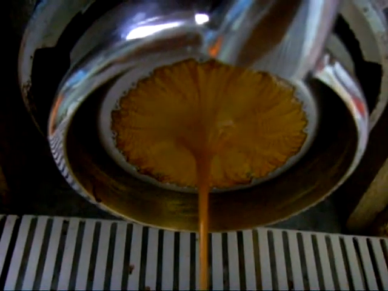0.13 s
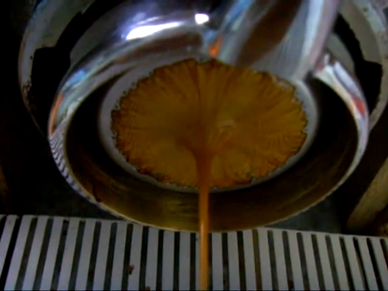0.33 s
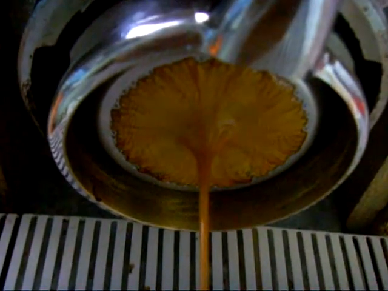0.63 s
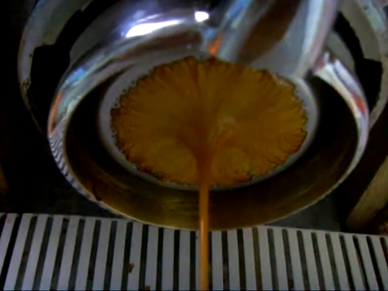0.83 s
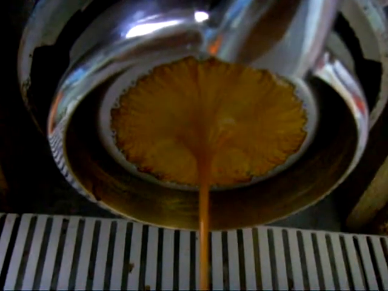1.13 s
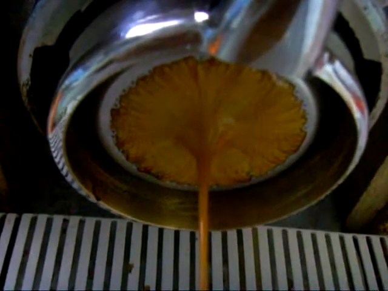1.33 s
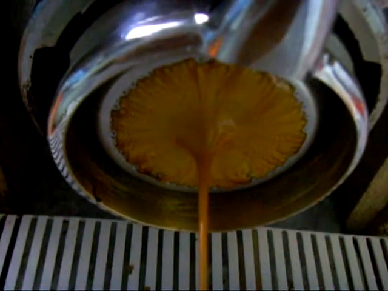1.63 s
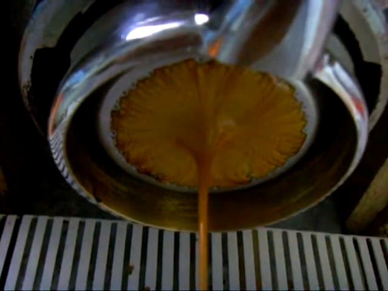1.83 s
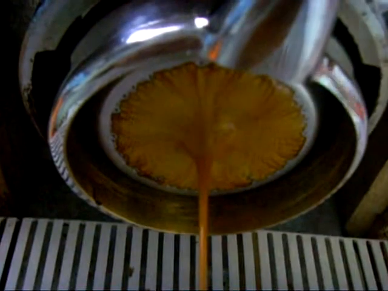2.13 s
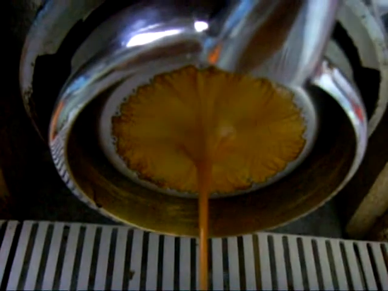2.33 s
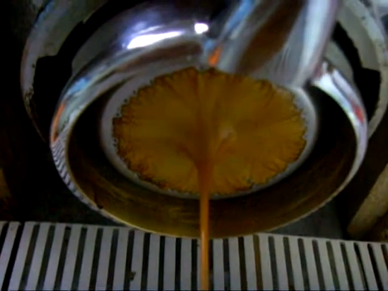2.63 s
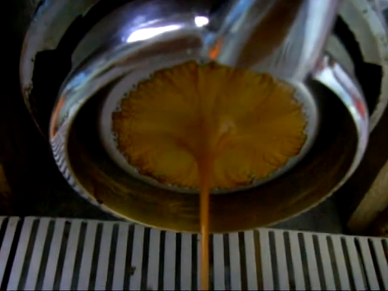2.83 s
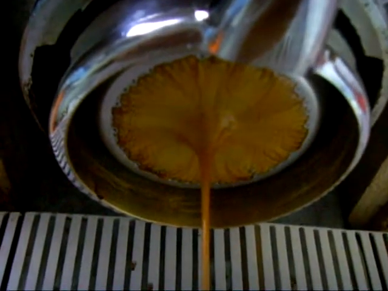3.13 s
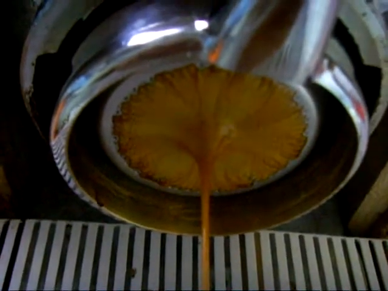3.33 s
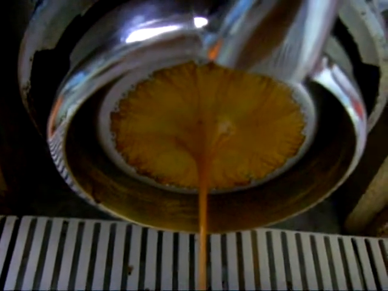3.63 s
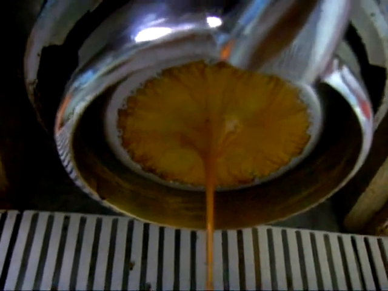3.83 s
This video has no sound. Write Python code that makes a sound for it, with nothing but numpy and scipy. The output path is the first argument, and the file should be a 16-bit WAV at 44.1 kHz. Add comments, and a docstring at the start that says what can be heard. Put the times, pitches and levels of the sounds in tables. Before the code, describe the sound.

An espresso machine pump buzzes loudly and steadily up close, its metal casing rattling. It cuts off abruptly before halfway, leaving small wet ticks and spits that thin out, and a faint puff of steam in a quiet room.

```python
"""A loud, clattering buzz stops and leaves ticking, spitting and fizzing in a quiet room.
It is an espresso machine's vibration pump, heard up close and then switched off.
Fifty times a second its piston clacks and shakes the casing, over the hum of its coil.
Afterwards the metal rings out, and the wet, hot machine gives off pops of water and puffs of steam."""
import sys
import numpy as np
from scipy import signal
from scipy.fft import rfft, irfft
from scipy.io import wavfile
from scipy.ndimage import uniform_filter1d

SR = 44100
rng = np.random.default_rng(int(sys.argv[2]) if len(sys.argv) > 2 else 0)


def write(x):
    x = np.atleast_2d(x).T
    wavfile.write(sys.argv[1], SR, np.round(np.clip(x, -1, 1) * 32767).astype(np.int16))


N = 176400
PUMP_HZ, FIRST_STROKE_S, OFF_S = 50.03, 0.003, 1.712


def amp(db):
    """Turns decibels into a number to multiply by."""
    return 10 ** (np.asarray(db) / 20)


def unit(x):
    """Scales a sound to an average (rms) level of 1."""
    return x / np.sqrt(np.mean(x ** 2) + 1e-20)


def running_level(x, db):
    """Sets the average level that a sound has while the pump runs."""
    return x * amp(db) / np.sqrt(np.mean(x[:round(OFF_S * SR)] ** 2) + 1e-20)


def look_up(points, hz):
    """Reads between the rows of a table, on a scale of octaves."""
    freqs, values = np.transpose(points)
    return np.interp(np.log(hz + 1), np.log(freqs + 1), values)


def add(mix, start_s, sound):
    """Mixes a sound in at a given time."""
    part = mix[max(round(start_s * SR), 0):][:len(sound)]
    part += sound[:len(part)]


def colour(x, tone):
    """Turns each frequency up or down as a table says."""
    gain = amp(look_up(tone, np.fft.rfftfreq(2 * N, 1 / SR)))
    return irfft(rfft(x, 2 * N) * gain)[:N]


def noise_band(hz, octaves):
    """Noise that is strongest around one frequency."""
    freqs = np.fft.rfftfreq(N, 1 / SR) + 1
    distance = np.log2(freqs / hz) / octaves
    return unit(irfft(rfft(rng.standard_normal(N)) / (1 + distance ** 2), N))


def bursts(table):
    """Short bursts of noise that start sharply and fade."""
    t, out = np.arange(N) / SR, np.zeros(N)
    for start_s, db, hz, octaves, fade_s in table:
        shape = np.minimum(t / 0.00045, 1) * np.exp(-t / fade_s)
        add(out, start_s, amp(db) * noise_band(hz, octaves) * shape)
    return out


def play(pulses, sound):
    """Starts a copy of a sound at every pulse."""
    return signal.fftconvolve(pulses, sound)[:N]


def strokes(lag_s, vary_db, jitter_s=0.00003):
    """One pulse for each piston stroke, a little uneven in strength and timing."""
    times = np.arange(FIRST_STROKE_S, OFF_S, 1 / PUMP_HZ) + lag_s
    late, size = np.clip(rng.standard_normal((2, len(times))), -2, 2)
    pulses = np.zeros(N)
    pulses[np.round((times + jitter_s * late) * SR).astype(int)] = amp(vary_db * size)
    return pulses


def piston(rise_s=0.00042, fade_s=0.0034, tail_s=0.014, same_share=0.19):
    """The piston hits its stop with a bright crack and returns with a softer one."""
    # tone of the clack (frequency [Hz], relative level [dB])
    tone = [(500, -16), (2000, -7.5), (3500, -7), (4400, -10), (5600, -8), (6450, -3.5), (6750, 0.5),
            (7150, -2), (7750, -6.5), (8450, 4), (9100, -5), (9700, -7.5), (10400, -7), (11500, -10),
            (12400, -22)]
    t = np.arange(N) / SR
    blows = strokes(lag_s=0, vary_db=1.2) + amp(-16.5) * strokes(lag_s=0.01105, vary_db=6.5)
    shape = np.minimum(t / rise_s, 1) * (np.exp(-t / fade_s) + amp(-24) * np.exp(-t / tail_s))
    # part of each clack is the same every time, the rest is fresh noise
    same = play(blows, shape * rng.standard_normal(N))
    fresh = np.sqrt(abs(play(blows ** 2, shape ** 2))) * rng.standard_normal(N)
    clacks = np.sqrt(same_share) * same + np.sqrt(1 - same_share) * fresh
    return running_level(colour(clacks, tone), db=-25)


def casing(fade_s=0.01):
    """Every stroke gives the casing the same short shudder, which makes a clean buzz."""
    # tone of the shaken casing (frequency [Hz], relative level [dB])
    tone = [(20, -65), (120, -48), (155, -16), (200, -5.5), (260, -3), (330, -0.5), (420, -2.5), (510, 3),
            (610, -6.5), (700, -5.5), (810, 6), (900, 2), (985, -15), (1050, 1.5), (1130, -13), (1260, 2),
            (1400, -7), (1560, 0.5), (1720, -13.5), (2100, -3.5), (2350, -15.5), (2780, -12.5), (3100, -38),
            (4500, -33), (7000, -57)]
    t = np.arange(N) / SR
    fade = np.exp(-t / fade_s)
    shudder = rng.standard_normal(N) * fade
    for _ in range(8):  # in turn, make all frequencies equally strong and smooth the fade
        spectrum = rfft(shudder)
        even = irfft(spectrum / (abs(spectrum) + 1e-12), N)
        loudness = np.sqrt(abs(uniform_filter1d(even ** 2, size=130)) + 1e-14)
        shudder = even / loudness * fade
    buzz = play(strokes(lag_s=0.001782, vary_db=0.3), even[:SR // 10])
    return running_level(colour(buzz, tone), db=-24)


def ringing_metal(rise_s=0.0041):
    """Metal parts ring on from stroke to stroke, never struck quite alike."""
    # notes of the metal (pitch [Hz], level [dB], time to fade 60 dB [s], phase scatter [rad])
    notes = [(361, -40, .17, 0.31), (705, -38.5, 0.43, 3.2), (1373, -41.5, 0.066, 2),
             (1850, -24.5, 0.074, 1.03), (2754, -46, 0.03, 0.96), (3270, -54.5, 0.66, 2.2),
             (5106, -38, 0.018, 2), (5090, -44, 0.2, 1.9), (8380, -41.5, 0.022, 3.1)]
    t, out = np.arange(N) / SR, np.zeros(N)
    for hz, db, ring_s, scatter in notes:
        blows = strokes(lag_s=0.0045, vary_db=2) * np.exp(1j * scatter * rng.standard_normal(N))
        note = np.exp((2j * np.pi * hz - np.log(1000) / ring_s) * t) * (1 - np.exp(-t / rise_s))
        out += running_level(play(blows, note).real, db)
    return out


def panel_rattle(rise_s=0.0037, fade_s=0.024):
    """Loose panels chatter, differently after each stroke."""
    # tone of the panels (frequency [Hz], relative level [dB])
    tone = [(20, -35), (100, -21.5), (250, -22), (400, -2.5), (600, -9.5), (720, 1.5), (1000, -3),
            (1350, -2), (1700, -12.5), (2100, -9), (2400, -16), (3500, -15), (6000, -11), (11000, -19)]
    t = np.arange(N) / SR
    shape = np.minimum(t / rise_s, 1) * np.exp(-t / fade_s)
    chatter = play(strokes(lag_s=0.0029, vary_db=0.5), shape) * rng.standard_normal(N)
    return running_level(colour(chatter, tone), db=-27)


def valve_pings(centre_hz=8050, spread_hz=710, fade_s=0.00095):
    """The valve snaps shut with a tiny ping whose pitch differs from stroke to stroke."""
    t, out = np.arange(SR // 100) / SR, np.zeros(N)
    pulses = strokes(lag_s=0, vary_db=1.5)
    for at in np.flatnonzero(pulses):
        hz = centre_hz + spread_hz * rng.standard_normal()
        add(out, at / SR, pulses[at] * t * np.exp(-t / fade_s) * np.sin(2 * np.pi * hz * t))
    return running_level(out, db=-32)


def stopping_knocks():
    """The pump knocks harder twice as it comes to a stop."""
    # knocks (time [s], level [dB], centre [Hz], width [octaves], fade [s])
    knocks = [(1.629, -16.5, 5240, 0.37, .003), (1.7045, -14, 6290, 0.58, 0.004)]
    return bursts(knocks)


def coil_hum(hold_s=0.037, ring_s=0.44):
    """The coil hums at twice the stroke rate; the hum lingers after switch-off."""
    t = np.arange(N) / SR
    fade = amp(-60 * np.maximum(t - OFF_S - hold_s, 0) / ring_s)
    return running_level(np.sin(2 * np.pi * 2 * PUMP_HZ * t) * fade, db=-42.5)


def tick(peak_db, low_db, echo_s=0.00069):
    """A tiny pop rings for a few milliseconds and bounces off the metal close by."""
    # notes in a tick (pitch [Hz], relative level [dB], time to fade 60 dB [s])
    notes = [(1080, -26, .005), (2100, -21, 0.0059), (2250, -8, 0.0072), (2510, 0, 0.0072),
             (4650, 1.5, 0.0025), (7100, 1, 0.0061), (8360, 3.5, 0.0051), (9500, -19, 0.0022)]
    t, ring = np.arange(SR // 50) / SR, np.zeros(SR // 50)
    for hz, db, ring_s in notes:
        strength = amp(db + low_db * (hz < 3000))
        pitch = hz * (1 + 0.0082 * rng.standard_normal())
        ring += strength * amp(-60 * t / ring_s) * np.sin(2 * np.pi * pitch * t)
    add(ring, echo_s, 0.17 * ring)
    return amp(peak_db) * ring / abs(ring).max()


def wet_ticks(lift_db=1.5, faint_per_s=29, fall_db_per_s=5):
    """The wet machine ticks clearly, among many faint ticks that die away as the pressure falls."""
    # clear ticks (time [s], peak level before the lift [dB], boost of the low notes [dB])
    clear_ticks = [(1.8003, -29, -17), (1.8084, -28.5, 8), (1.8305, -31, 11), (1.8538, -30, 1),
                   (1.865, -31, -3), (1.8712, -27.5, 5), (1.887, -28, 4), (1.924, -28, 4),
                   (1.934, -23.5, -1), (1.945, -28.5, 6), (2.077, -36, 4), (2.097, -29, 5),
                   (2.1045, -33, 8), (2.1284, -28, 8), (2.135, -33, 9), (2.167, -32, -5), (2.1862, -32, 4),
                   (2.206, -29, 7), (2.216, -27, 2), (2.2582, -24, 1), (2.266, -35, 6), (2.2998, -25.5, 3),
                   (2.3220, -33, 8), (2.3713, -33, 0), (2.3804, -42, 3), (2.4008, -29, 3), (2.4871, -33, 8),
                   (2.5091, -27.5, -2), (2.562, -31.5, -5), (2.6204, -20.5, -3), (2.6424, -40, 2),
                   (2.667, -28.5, 4), (2.714, -29.5, -3), (2.7732, -28.5, 2), (2.8163, -35, 3),
                   (2.968, -33, 6), (3.0943, -35, 4), (3.4674, -28, 1), (3.636, -32, 2), (3.6604, -29, -7)]
    out = np.zeros(N)
    for start_s, db, low_db in clear_ticks:
        add(out, start_s, tick(db + lift_db, low_db))
    since_off = np.arange(N) / SR - OFF_S
    faint_pulses = (rng.random(N) < faint_per_s / SR) * (since_off > 0)
    faint_db = -40 - fall_db_per_s * since_off + 3.4 * rng.uniform(-1, 1, N)
    return out + play(faint_pulses * amp(faint_db), tick(peak_db=0, low_db=18))


def water_spits():
    """Spurts of water and air spit and gurgle."""
    # spurts (time [s], level [dB], centre [Hz], width [octaves], fade [s])
    spurts = [(1.879, -37, 600, 0.88, 0.017), (1.879, -42, 4800, 0.32, .006),
              (2.0562, -32, 5630, .6, 0.0042), (2.057, -40, 990, 0.28, .01),
              (2.064, -45.5, 5460, 0.8, 0.024), (2.235, -49, 5470, 0.89, 0.041),
              (2.235, -45.5, 765, .7, 0.032), (2.591, -43.5, 6800, 0.33, .003),
              (2.8335, -38, 7850, 0.085, 0.0046), (3.341, -29.5, 10700, 0.55, .0016),
              (3.342, -42, 1090, 1.7, .005), (3.3855, -33.5, 5960, 0.54, 0.0016)]
    return bursts(spurts)


def steam():
    """Steam hisses in soft puffs, and escaping air makes thin, wavering whistles."""
    # puffs of steam (middle [s], length [s], level [dB])
    puffs = [(3.81, 0.12, -53), (3.978, 0.12, -49)]
    # whistles of air (start [s], end [s], pitch [Hz], level [dB], waver [Hz])
    whistles = [(2.84, 4.1, 8123, -68.5, 13.3), (3.504, 3.627, 8850, -60, 70)]
    t = np.arange(N) / SR
    swells = sum(amp(db) * np.exp(-(2 * (t - middle) / length) ** 2) for middle, length, db in puffs)
    out = noise_band(hz=5300, octaves=0.75) * swells
    for start, end, hz, db, waver_hz in whistles:
        pitch = hz + waver_hz * unit(uniform_filter1d(rng.standard_normal(N), size=200))
        shape = np.clip(np.minimum(t - start, end - t) / 0.02, 0, 1)
        out += amp(db) * shape * unit(np.sin(2 * np.pi * np.cumsum(pitch) / SR))
    return out


def room_echo(x):
    """A small room adds a tail of echoes in which low sounds last longest."""
    # length of the echo (frequency [Hz], time to fade 60 dB [s])
    fade_times = [(200, 1), (800, 0.43), (3000, 0.19), (6000, 0.25), (11000, 0.17)]
    hz, t, noise = signal.stft(rng.standard_normal(SR // 2), SR, nperseg=256)
    fade = amp(-60 * t / look_up(fade_times, hz)[:, None])
    tail = signal.istft(noise * fade, SR)[1]
    return play(x, tail / np.linalg.norm(tail))


def room_noise(drone_width_hz=11):
    """The room has a soft rush with a few faint, wavering drones."""
    # tone of the rush (frequency [Hz], relative level [dB])
    tone = [(15, -10.5), (42, 2.5), (70, -6.5), (100, -4.5), (135, -14), (185, -13), (228, -0.5),
            (280, -10.5), (430, -4.5), (660, -9), (900, -8), (1100, -12), (1400, -9.5), (1750, -15.5),
            (2550, -14.5), (3200, -22), (6300, -24), (7100, -22.5), (7800, -21), (8800, -21),
            (10100, -20.5), (11000, -27.5), (12300, -26.5)]
    # drones in the room (pitch [Hz], level [dB])
    notes = [(232, -62.5), (485, -66), (575, -66.5), (795, -63.5)]
    drones = sum(amp(db) * noise_band(hz, np.log2(1 + drone_width_hz / hz)) for hz, db in notes)
    return amp(-48.5) * unit(colour(rng.standard_normal(N), tone)) + drones


def scene():
    """Mixes the pump, the small sounds of water, and the room."""
    clatter = panel_rattle() + ringing_metal() + piston() + valve_pings() + stopping_knocks()
    water = wet_ticks() + water_spits()
    echoes = room_echo(amp(-11.5) * clatter + amp(-13.5) * water)
    return (casing() + coil_hum() + clatter + water + steam() + echoes + room_noise())[None]


def record(dry, top_hz=12400):
    """The microphone softens the highest treble, and everything above top_hz is cut off."""
    # tone of the microphone (frequency [Hz], gain [dB])
    tone = [(100, -1), (10000, 0.5), (11000, -5), (12300, -19)]
    treble_cut = signal.firwin(255, top_hz, window=("kaiser", 9), fs=SR)
    return signal.oaconvolve(colour(dry[0], tone), treble_cut, "same")[None]


dry = scene()
out = record(dry)
write(out)
```